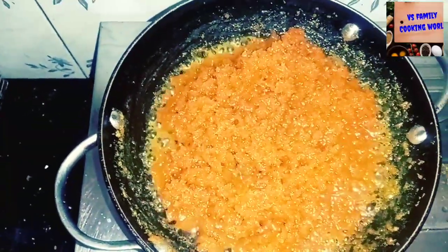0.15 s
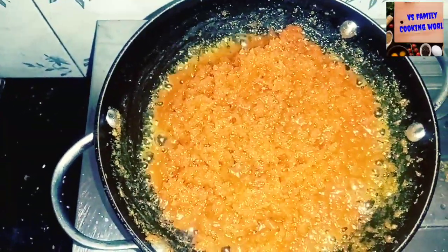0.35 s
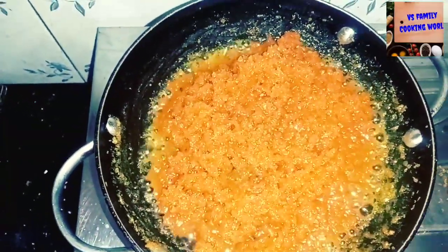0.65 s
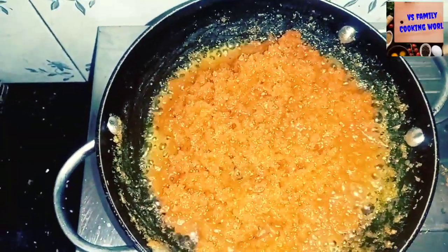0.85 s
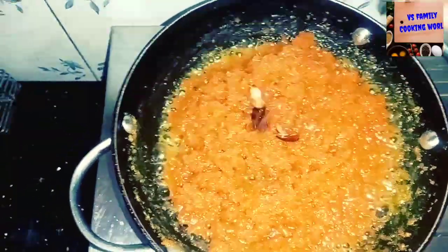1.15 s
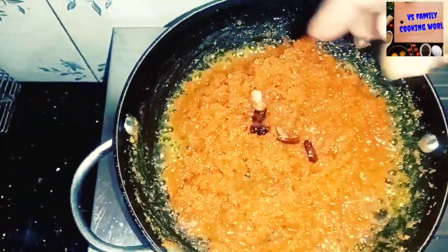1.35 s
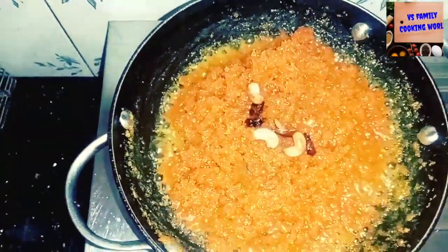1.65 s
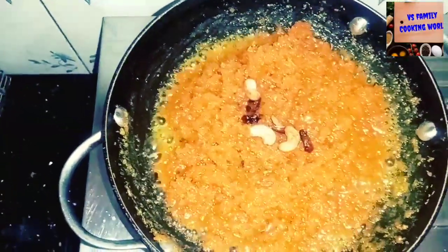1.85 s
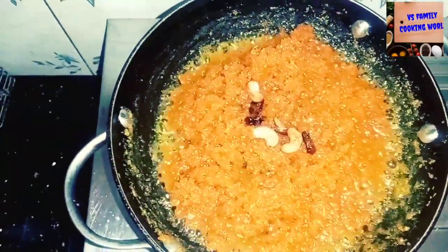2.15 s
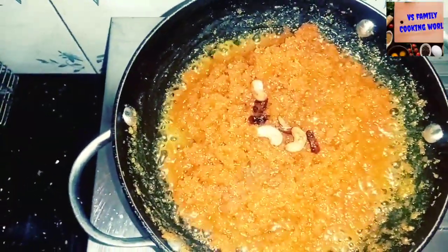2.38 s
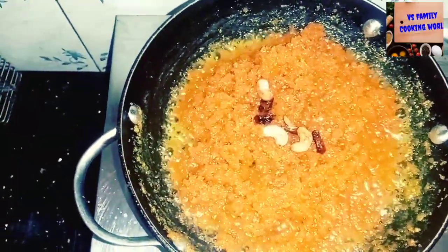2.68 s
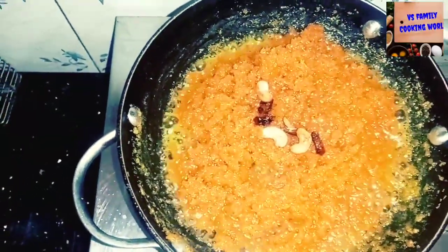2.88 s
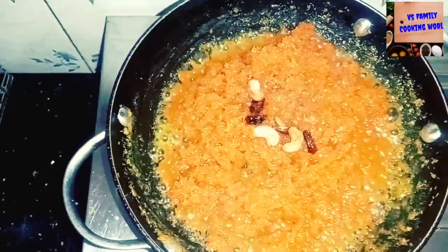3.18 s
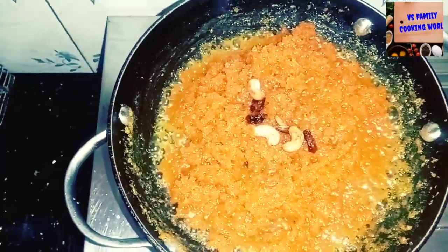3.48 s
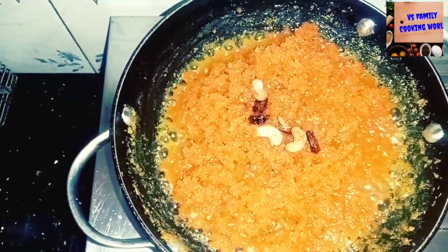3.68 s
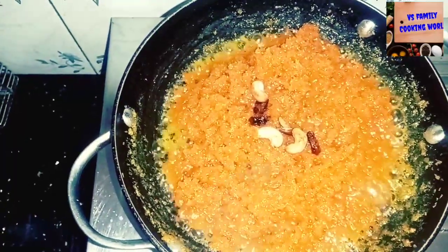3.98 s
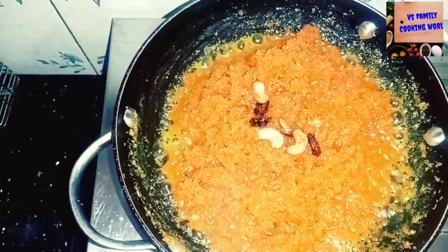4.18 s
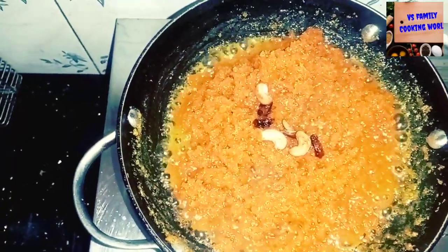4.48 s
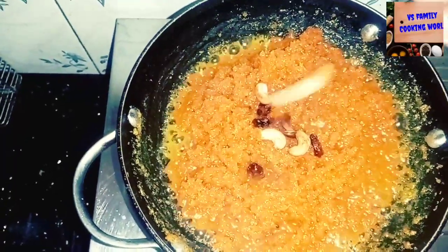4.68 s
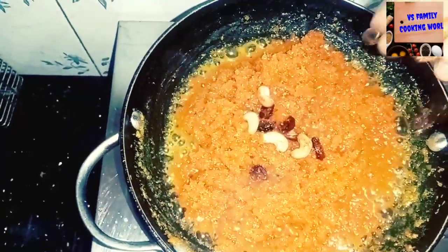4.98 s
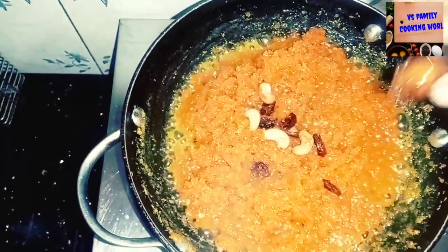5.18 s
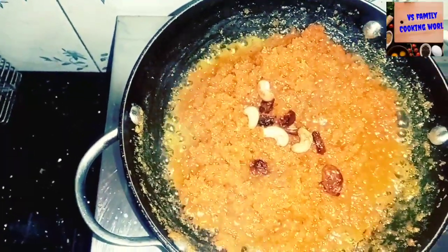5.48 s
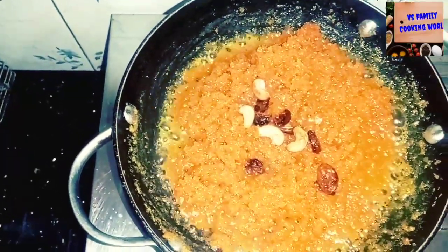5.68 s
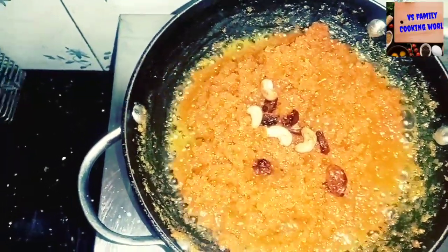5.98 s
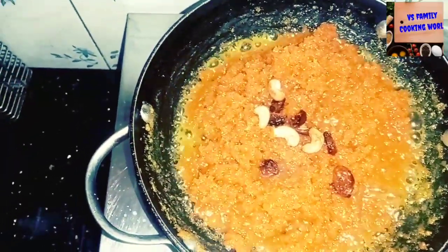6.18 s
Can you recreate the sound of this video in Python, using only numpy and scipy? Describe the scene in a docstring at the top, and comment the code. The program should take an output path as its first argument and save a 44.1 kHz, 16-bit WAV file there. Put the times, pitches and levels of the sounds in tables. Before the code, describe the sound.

Constant crackling froth of frying in fat, heard from a single microphone just over the pan, identical on both sides. The burner breathes quietly behind, with a faint low room rumble. Small things knock at first, something clacks and rattles briefly, muted worktop bumps follow, then a short stick-slip scuff and a crisp tick. Weak ticks, low plops and a few hollow bumps finish it, with short kitchen reflections.

```python
"""Halwa frying in ghee, small kitchen

One microphone just above a pan on the stove, the same signal in both channels.
Sizzle: random short pings over noise froth, with a thin high hiss. Dull plops: damped, rising sines.
Sharp ticks, a rattling clack, light knocks and scuffs: decaying bursts of narrow noise.
Soft hollow bumps: low worktop modes. Behind: the burner's resonant rush and a low room rumble.
The bubble bursts and the handling sounds carry kitchen reflections."""
import sys
import numpy as np
from scipy import signal
from scipy.fft import rfft, irfft
from scipy.io import wavfile

SR = 44100
rng = np.random.default_rng(int(sys.argv[2]) if len(sys.argv) > 2 else 0)


def inscribe(sig):
    """Save sig as 16-bit PCM at rate SR to the path in sys.argv[1].

    A 1-D sig is mono; a 2-D sig holds one channel per row.
    Samples are clipped to [-1, 1] before scaling.
    """
    pcm = np.round(np.clip(np.atleast_2d(sig).T, -1, 1) * 32767)
    wavfile.write(sys.argv[1], SR, pcm.astype(np.int16))


N = 279594

# Strike levels are nominal dry peaks, before reflections; band widths are nominal.
# Colour of the frying, relative spectral density: f/Hz, level/dB per Hz
SIZZLE_COLOUR = [(700, -33.5), (2300, -12), (2900, -8), (3350, -10), (3750, -4), (4300, -5.5), (5300, -4),
                 (6550, 0), (7100, -4), (7950, -6.5), (8600, -4.5), (10000, -12), (11500, -16.5),
                 (14000, -17.5)]
# Colour of the thin high hiss, relative spectral density: f/Hz, level/dB per Hz
HISS_COLOUR = [(13600, -34), (14050, -32), (14450, -11), (14650, -3), (16000, -6)]
# Strongest plops in the thick mixture, levels before the common plop gain: t/s, level/dB, f/Hz at onset
STRONG_PLOPS = [(.847, -46, 169), (1.68, -45, 95), (2.207, -46, 121), (4.153, -42.5, 173),
                (4.294, -45, 187), (5.157, -46, 107), (5.577, -45, 102), (6.096, -46, 110),
                (6.28, -47, 105)]
# Sharp ticks at the pan: t/s, level/dB, f/Hz centre, width/octaves
PAN_TICKS = [(1.511, -24.5, 6060, 0.36), (2.7724, -27, 5400, .44), (3.7061, -18, 5170, 0.43),
             (3.975, -31.5, 7460, .13), (4.396, -32, 6200, .4), (4.589, -30, 7500, 0.15),
             (5.3523, -32, 5400, 0.44)]
# Light knocks of kitchen things: t/s, body level/dB, body f/Hz, body width/octaves,
# overtone level/dB, overtone f/Hz, overtone width/octaves
KITCHEN_KNOCKS = [(0.0266, -25, 1100, 0.55, -24, 3030, 0.068), (.1123, -24, 1800, 0.28, -34, 3480, 0.34),
                  (3.706, -35, 1650, 0.26, -33.5, 3660, 0.13)]
# Scuffs along the worktop in quick slips: start t/s, length/s, first tap level/dB,
# fall to the end/dB, level of the bump under the first slip/dB
WORKTOP_SCUFFS = [(0.12, .017, -40, 0.5, -46), (3.429, 0.013, -40, 1, -63), (3.602, .132, -35.5, 6, -44.5)]
# Soft bumps on the worktop, each rocking to rest: t/s, level/dB, fall per rock/dB
WORKTOP_BUMPS = [(.034, -38.5, 8), (2.12, -52, 9), (2.312, -49.5, 2), (2.538, -48.5, 4), (2.708, -49.5, 7),
                 (3.327, -45.5, 4.5), (5.905, -43.5, 15), (6.07, -47, 3.5), (6.275, -44.5, 9)]
# Hollow ring of the worktop, relative levels: f/Hz, level/dB, t60/s
WORKTOP_MODES = [(174, -18, 0.18), (234, 0.5, 0.064), (263, -10.5, 0.062), (288.6, -1.5, 0.14),
                 (336, -11, 0.064), (431, -15.5, 0.16)]
# Resonances of the burner's rush under the pan, relative levels: f/Hz, nominal width/Hz, level/dB
BURNER_RESONANCES = [(639.5, 45, -9.5), (861, 152, -3.5), (952, 81, -1), (1067, 64, -0.5), (1197, 105, -7),
                     (1307, 53, -2), (1407, 34, -1.5), (1588, 114, -2.5), (1810, 166, -2), (2056, 203, -2),
                     (2880, 570, -4.5)]
# Colour of the kitchen's low rumble, relative spectral density: f/Hz, level/dB per Hz
RUMBLE_COLOUR = [(28, -47), (48, -39), (72, -11.5), (92, -1.5), (118, -1), (142, -13.5), (175, 2.5),
                 (215, -3), (260, -7.5), (310, -8.5), (370, -12.5), (440, -11.5), (520, -21.5), (1000, -27)]

PLOPS_PER_S, LARGE_POCKET_HZ, SMALL_POCKET_HZ, LARGE_SHARE = 3, 101, 185, .3
TICK_DECAY_MS = 0.91
CLACK_S, CLACK_DB, CLACK_HZ, CLACK_OCTAVES, CLACK_DECAY_MS = 1.5342, -16.5, 5340, .15, 1.13
SLIP_GAP_S, SLIP_HZ, SLIP_OCTAVES, SLIP_DECAY_MS = .0265, 1520, 0.38, 5.6
ROCK_GAP_S = .063
EDGE_HZ = 15540


def sizzle(level_db, froth_db, surge_db, hiss_db):
    """Separate bursts over a fine froth; the boiling surges slightly and a high hiss lies on top."""
    pops = unit(kitchen(bursts(per_s=2600, spread_db=2.5), t60=0.11, wet_db=-2.5))
    froth = amp(froth_db) * rng.standard_normal(N)
    frying = (pops + froth) * amp(surge_db * drift(21.0))
    hiss = colour(frying * amp(.8 * drift(40)), HISS_COLOUR)
    return amp(level_db) * colour(frying, SIZZLE_COLOUR) + amp(hiss_db) * hiss


def bursts(per_s, spread_db, count=32):
    """Tiny bubbles burst at random, each a short damped ping; most are weak, a few strong."""
    t = np.arange(256) / SR
    out = np.zeros(N)
    for hz in np.linspace(1500, 15500, count):
        size = amp(spread_db * np.minimum(rng.exponential(1, N), 4.5))
        clicks = size * (rng.random(N) < per_s / count / SR)
        ping = np.sin(2 * np.pi * hz * t) * np.exp(-t / 0.00054)
        out += signal.oaconvolve(clicks, ping)[:N]
    return unit(out)


def plops(rows, gain_db, rise, decay, glide):
    """Steam pockets swell and open with a few damped cycles of slightly rising pitch."""
    t = np.arange(SR // 6) / SR
    shape = (1 - np.exp(-t / rise)) ** 2 * np.exp(-t / decay)
    shape /= shape.max()
    out = np.zeros(N)
    for s, db, hz in rows:
        cycles = np.sin(2 * np.pi * hz * t * (1 + glide * t))
        add(out, s, amp(db + gain_db) * shape * cycles)
    return out


def simmer(level_db, spread_db, detune):
    """Weak plops at uneven intervals, each near the pitch of a large or a small steam pocket."""
    rows = []
    draws = rng.random((int(PLOPS_PER_S * N / SR), 4))
    for k, (when, size, kind, tune) in enumerate(draws):
        pocket_hz = LARGE_POCKET_HZ if kind < LARGE_SHARE else SMALL_POCKET_HZ
        hz = pocket_hz * (1 + detune * (2 * tune - 1))
        rows.append(((k + when) / PLOPS_PER_S, level_db - spread_db * size, hz))
    return rows


def strikes(rows, rise):
    """Each contact is a short burst in one broad resonance that dies within milliseconds."""
    t = np.arange(4096) / SR
    out = np.zeros(N)
    for s, db, hz, octaves, decay_ms in rows:
        noise = rng.standard_normal(len(t))
        band = np.exp(-(np.log2(bins(noise) / hz) / (2 * octaves)) ** 2)
        narrow = irfft(rfft(noise) * band)
        even = np.cos(np.angle(signal.hilbert(narrow)))  # even strength, wandering phase
        ring = unit(irfft(rfft(even) * np.sqrt(band))) / np.sqrt(2)
        shape = (1 - np.exp(-t / rise)) * np.exp(-t / (decay_ms / 1000))
        add(out, s, amp(db) * ring * shape / shape.max())
    return out


def rattle(gap, first_db, fall_db, hz, octaves, decay_ms, count=5):
    """A hard clack is followed by quick rebounds, duller and each weaker than the last."""
    clack = (CLACK_S, CLACK_DB, CLACK_HZ, CLACK_OCTAVES, CLACK_DECAY_MS)
    rebounds = [(CLACK_S + gap * (k + 1), first_db - fall_db * k, hz, octaves, decay_ms)
                for k in range(count)]
    return [clack] + rebounds


def knock_parts(body_ms, overtone_ms, click_db, click_hz, click_ms, low_db, low_hz, low_ms, low_lag):
    """Each knock wakes a body and an overtone, with a faint bright click and a lower ring just behind."""
    rows = []
    for s, db, hz, octaves, over_db, over_hz, over_octaves in KITCHEN_KNOCKS:
        rows += [(s, db, hz, octaves, body_ms),
                 (s, over_db, over_hz, over_octaves, overtone_ms),
                 (s, db + click_db, click_hz, .5, click_ms),
                 (s + low_lag, db + low_db, low_hz, .3, low_ms)]
    return rows


def slips(jitter, scatter_octaves):
    """A scuff sticks and slips almost regularly; each slip gives a tap and bumps the worktop."""
    taps, blows = [], []
    for start, length, first_db, fall_db, bump_db in WORKTOP_SCUFFS:
        steps = max(round(length / SLIP_GAP_S), 1)
        for u in np.linspace(0, 1, steps + 1):
            late, spot = rng.uniform(-1.026, 1, 2)
            s = start + u * length + jitter * late
            hz = SLIP_HZ * 2 ** (scatter_octaves * spot)
            taps.append((s, first_db - u * fall_db, hz, SLIP_OCTAVES, SLIP_DECAY_MS))
            blows.append((s, bump_db - u * fall_db))
    return taps, blows


def bumps(rows, rise):
    """Soft blows wake the low modes of the worktop, a little differently at each spot."""
    t = np.arange(SR // 3) / SR
    out = np.zeros(N)
    for s, db in rows:
        ring = np.zeros(len(t))
        for hz, mode_db, t60 in WORKTOP_MODES:
            spot = 1 + 0.03 * rng.standard_normal()
            mode = np.sin(2 * np.pi * (hz * spot * t + rng.random()))
            ring += amp(mode_db - 60 * t / t60) * mode
        ring *= 1 - np.exp(-t / rise)
        add(out, s, amp(db) * ring / abs(ring).max())
    return out


def rocking(count=3):
    """Each bump repeats at even gaps, weaker every time."""
    return [(s + k * ROCK_GAP_S, db - k * fall_db) for s, db, fall_db in WORKTOP_BUMPS for k in range(count)]


def burner(level_db, flutter_db):
    """Turbulence of the flame rings the gap beneath the pan."""
    noise = rng.standard_normal(N)
    f = bins(noise)
    power = sum(amp(db) ** 2 / (1 + ((f - hz) / (0.89 * width)) ** 2) ** 2
                for hz, width, db in BURNER_RESONANCES)
    rush = unit(irfft(rfft(noise) * np.sqrt(power), N))
    return amp(level_db + flutter_db * drift(12)) * rush


def rumble(level_db, swell_db):
    """A lumpy low rumble fills the room: coloured noise of wandering level."""
    return amp(level_db + swell_db * drift(26)) * colour(rng.standard_normal(N), RUMBLE_COLOUR)


def kitchen(x, t60, wet_db):
    """Adds dense reflections from tiles and worktop; the treble dies sooner."""
    t = np.arange(SR // 2) / SR
    taps = rng.standard_normal(len(t)) * (t > .003)  # first reflections after 3 ms
    low = signal.sosfilt(signal.butter(2, 3500, fs=SR, output="sos"), taps)
    high = signal.sosfilt(signal.butter(2, 3500, "high", fs=SR, output="sos"), taps)
    tail = low * amp(-60 * t / t60) - high * amp(-60 * t / (0.23 * t60))
    return x + amp(wet_db) * signal.fftconvolve(x, tail / np.linalg.norm(tail))[:N]


def colour(x, points):
    """Filters by a spectrum drawn on a log-frequency axis; rms 1."""
    hz, db = np.transpose(points)
    gain = amp(np.interp(np.log(bins(x)), np.log(hz), db))
    return unit(irfft(rfft(x) * gain, len(x)))


def drift(rate):
    """Slow random wandering of rms 1, up to about rate changes a second."""
    x = rng.standard_normal(N)
    return unit(irfft(rfft(x - x.mean()) / (1 + (bins(x) / rate) ** 2), N))


def bins(x):
    """Frequencies of the spectrum of x in Hz, shifted up by 1 Hz to stay above zero."""
    return np.fft.rfftfreq(len(x), 1 / SR) + 1


def add(mix, s, sound):
    """Lays a sound into the mix at time s."""
    part = mix[max(round(s * SR), 0):][:len(sound)]
    part += sound[:len(part)]


def amp(db):
    """Amplitude factor of a level in dB."""
    return 10 ** (np.asarray(db) / 20)


def unit(x):
    """Scales to rms 1."""
    return x / np.sqrt(np.mean(x ** 2) + 1e-20)


def scene():
    """All sources reach one microphone, the same in both channels; rise, decay, gap and lag in s."""
    steady = sizzle(level_db=-43, froth_db=4.0, surge_db=0.38, hiss_db=-48)
    steady += burner(level_db=-49.0, flutter_db=0.74) + rumble(level_db=-60.0, swell_db=2.0)

    weak_plops = simmer(level_db=-48, spread_db=5.5, detune=.06)
    bubbles = plops(STRONG_PLOPS + weak_plops, gain_db=-6.0, rise=0.007, decay=0.0094, glide=0.64)

    tick_rows = [(*row, TICK_DECAY_MS) for row in PAN_TICKS]
    ticks = kitchen(strikes(tick_rows, rise=0.00031), t60=0.44, wet_db=-6.5)

    contacts = rattle(gap=.0058, first_db=-25.0, fall_db=2.8, hz=4630, octaves=0.38, decay_ms=2.3)
    clack = kitchen(strikes(contacts, rise=.0007), t60=0.5, wet_db=-8.5)

    taps, blows = slips(jitter=0.00202, scatter_octaves=0.45)
    parts = knock_parts(body_ms=1.5, overtone_ms=2.5, click_db=-8.0, click_hz=5300, click_ms=4.5,
                        low_db=-13, low_hz=826, low_ms=6, low_lag=0.00295)
    handling = strikes(parts, rise=0.0001) + strikes(taps, rise=0.00051)
    knocks = kitchen(handling, t60=0.27, wet_db=-6.0)
    thuds = kitchen(bumps(rocking() + blows, rise=0.0032), t60=0.59, wet_db=-9.5)
    return np.tile(steady + bubbles + clack + ticks + knocks + thuds, (2, 1))


def record(dry):
    """A steep low-pass limits the band of both channels."""
    taps = signal.firwin(1023, EDGE_HZ, window=("kaiser", 8), fs=SR)
    return signal.oaconvolve(dry, taps[None], "same", axes=1)


dry = scene()
out = record(dry)
inscribe(out)
```